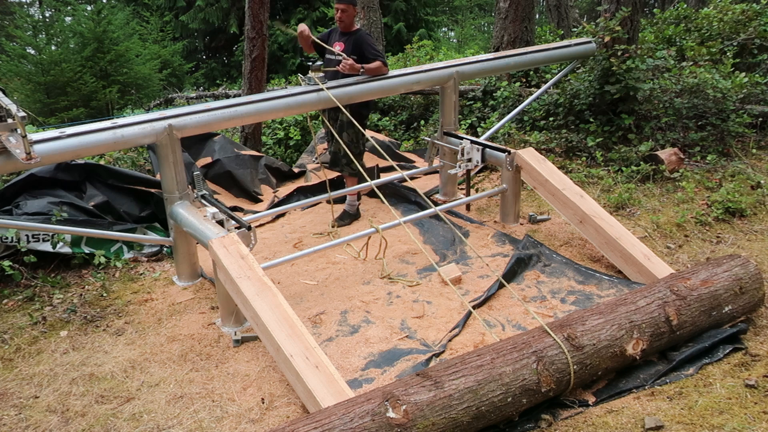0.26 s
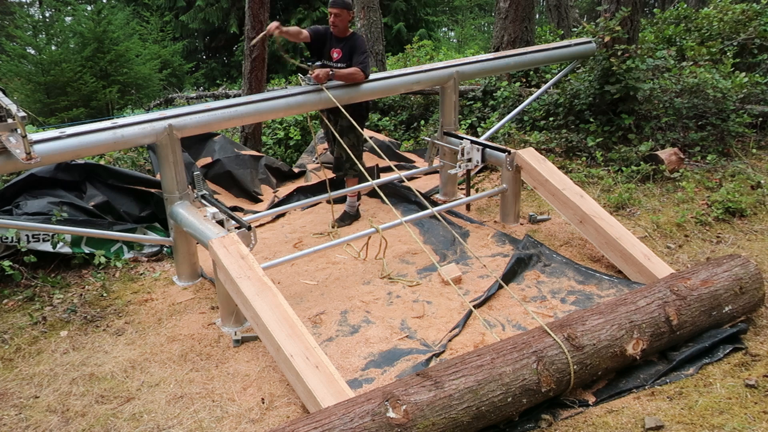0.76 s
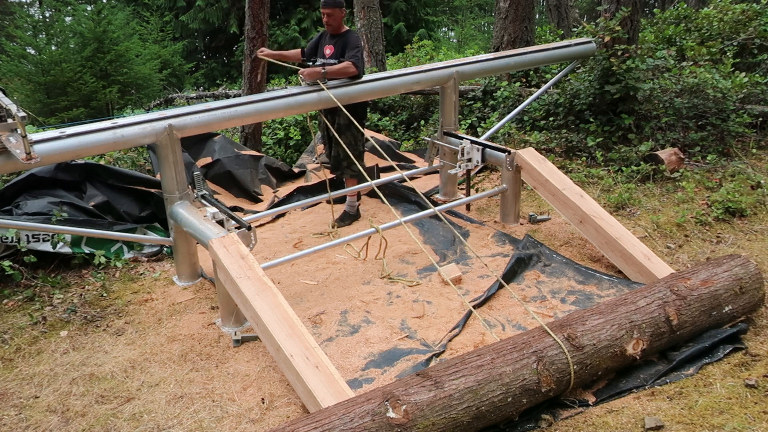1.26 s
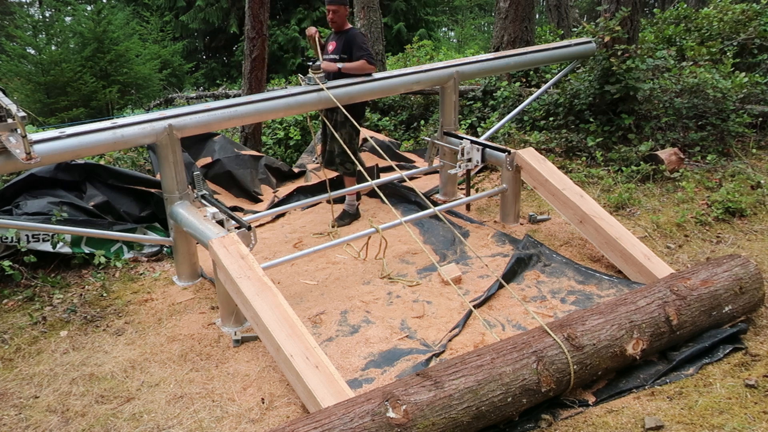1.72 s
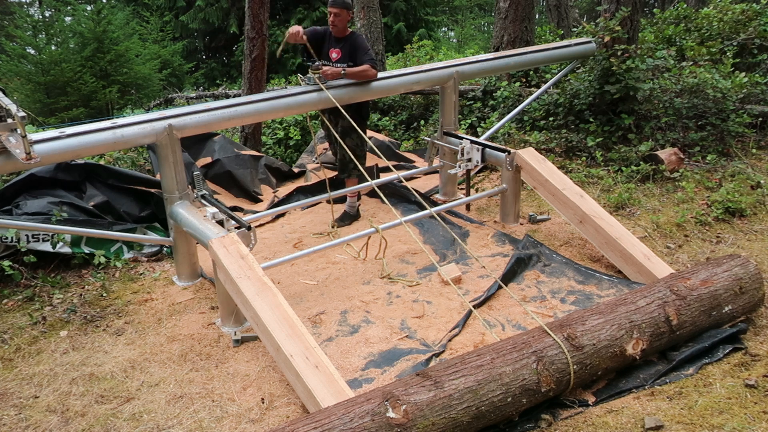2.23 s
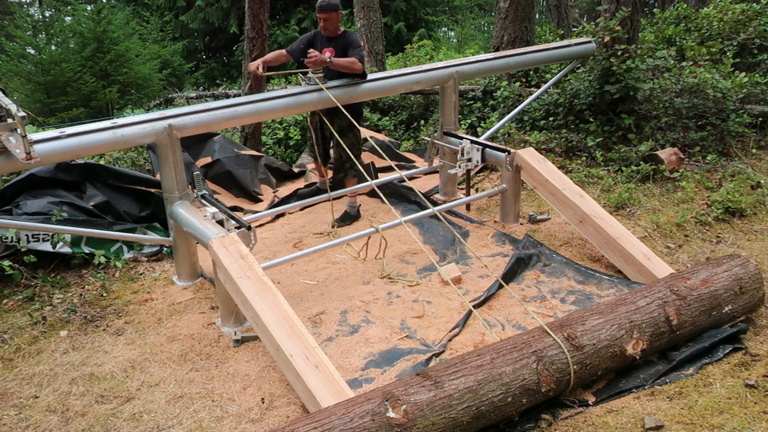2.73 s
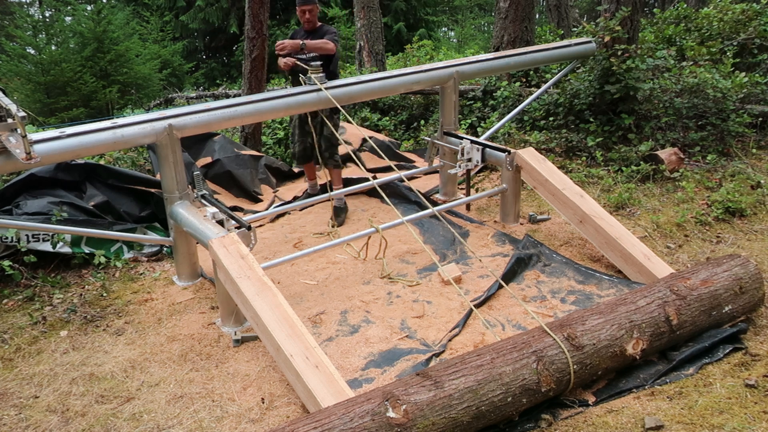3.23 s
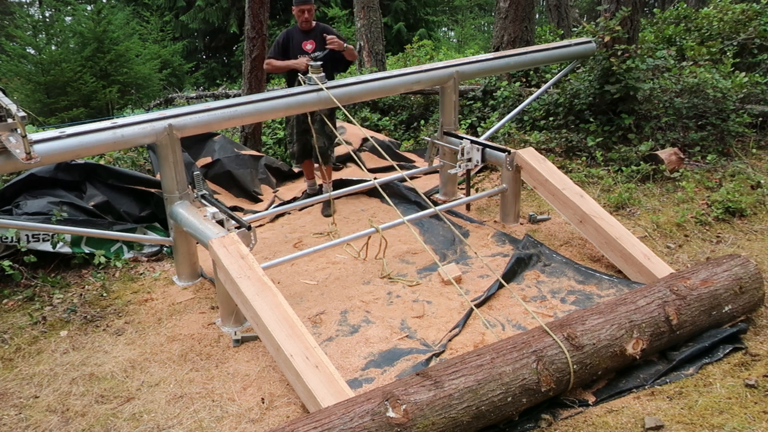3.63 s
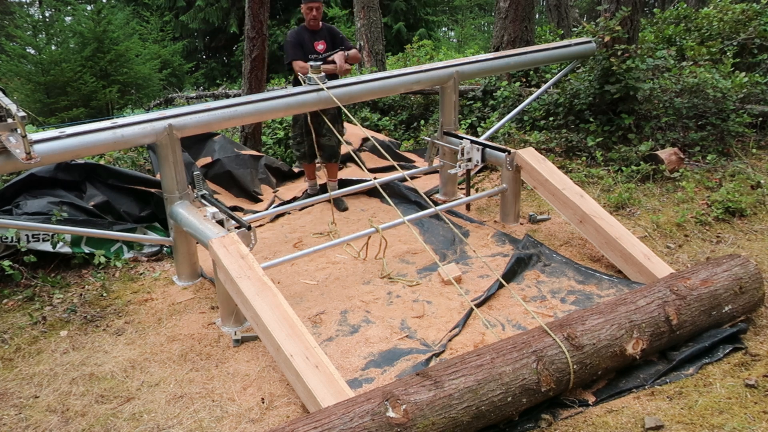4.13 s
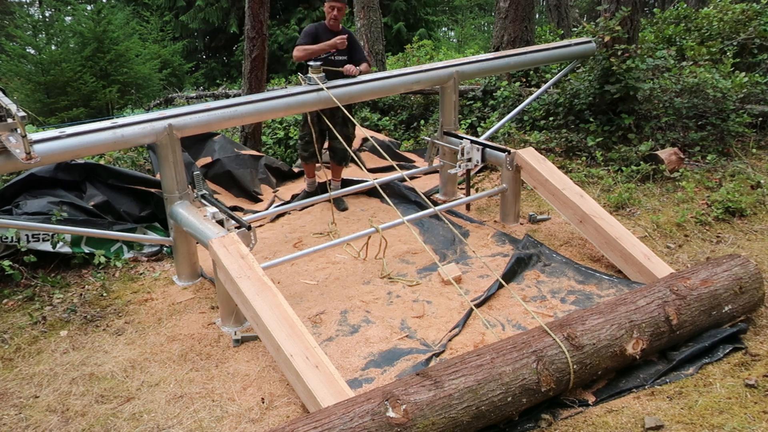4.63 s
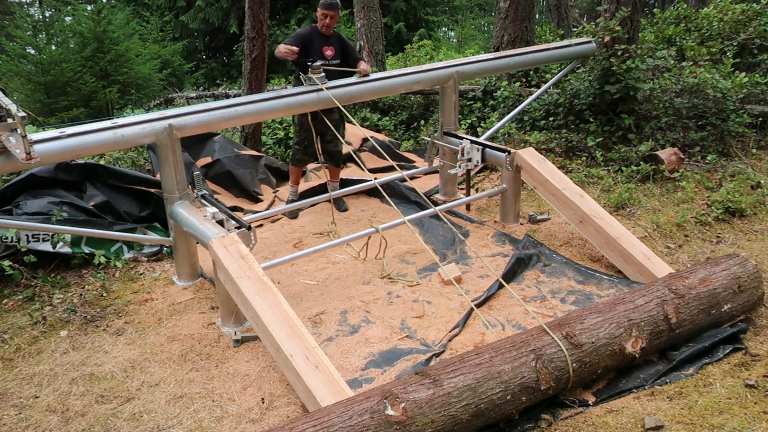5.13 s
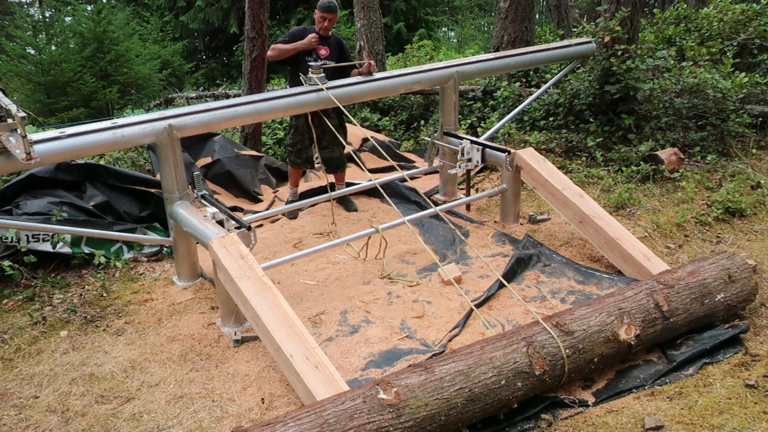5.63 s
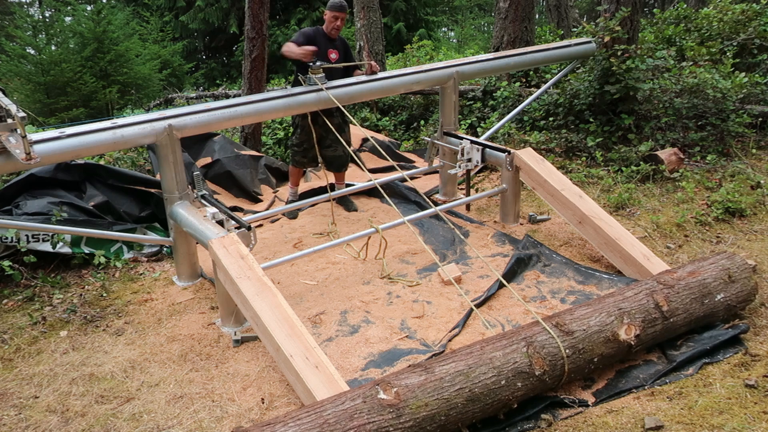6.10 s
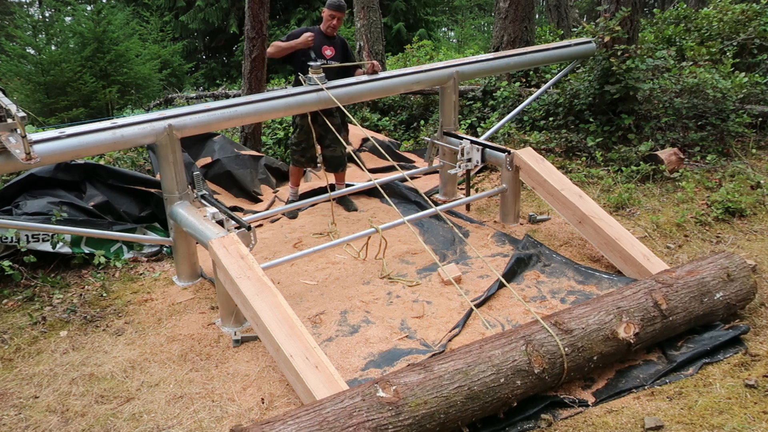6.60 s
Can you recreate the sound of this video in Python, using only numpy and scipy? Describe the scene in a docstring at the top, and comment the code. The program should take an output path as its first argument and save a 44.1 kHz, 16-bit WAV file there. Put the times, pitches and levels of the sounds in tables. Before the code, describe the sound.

In the woods, over a low rumble and soft leaf hiss, a hand winch clicks briefly and knocks against its hollow metal rail. After a pause, gritty rope rubbing leads into fast, irregular ratchet clicking and loud clunks, with a sharp snap of taut rope. A run of small gear chirps and a last few knocks follow. The winch sits near the centre of a stereo pair of microphones, with slight dull reflections.

```python
"""A forest clearing, a stereo pair of microphones facing a hand winch on a hollow metal rail.
As it is cranked the pawl drops from tooth to tooth and a small gear chirps; gears and handle knock
the rail as the load comes and goes, and the rope rasps and snaps over drum and rail.
Ground, timber and trunks echo dully, with a distant rumble and leaf hiss underneath.
The loudest knocks overload the recorder."""
import sys
import numpy as np
from scipy import signal
from scipy.io import wavfile

SR = 44100
rng = np.random.default_rng(int(sys.argv[2]) if len(sys.argv) > 2 else 0)


def master_out(mix):
    """Clip the mix to full scale and print it as 16-bit PCM to the path in sys.argv[1]."""
    frames = np.transpose(np.atleast_2d(mix))
    ceiling = np.clip(frames, -1, 1)
    pcm = np.round(ceiling * 32767).astype(np.int16)
    wavfile.write(sys.argv[1], SR, pcm)


N = 302443

# pawl landing on a tooth: t/s, level/dB
PAWL_DROPS = [(0.0434, -17), (0.0749, -16.5), (0.1, -27), (0.121, -21), (0.1453, -24.5), (.179, -25.5),
              (2.64, -22.5), (3.0715, -15.5), (3.1386, -15.5), (3.2092, -21), (3.251, -17), (3.2868, -17),
              (3.318, -16), (3.3473, -16.5), (3.3777, -18.5), (3.413, -15.5), (3.443, -17.5),
              (3.4716, -15.5), (3.5007, -15.5), (3.526, -14.5), (3.5494, -15.5), (3.5753, -15.5),
              (3.602, -16.5), (3.627, -18), (3.654, -18.5), (3.678, -12), (3.706, -28), (3.7385, -25.5),
              (3.777, -23.5), (3.823, -22.5), (3.87, -24), (3.92, -20), (4.065, -26.5), (4.115, -28),
              (4.66, -26), (4.8704, -19), (4.907, -20.5), (4.9358, -22), (4.9561, -17), (4.976, -17),
              (5.014, -14), (5.038, -20), (5.057, -27), (5.077, -18.5), (5.101, -18.5), (5.123, -13),
              (5.166, -26), (5.193, -28), (5.2185, -29), (5.243, -26), (5.2714, -23.5), (5.296, -23.5),
              (5.3254, -23.5), (5.3566, -23), (5.3871, -23.5), (5.4136, -23.5), (5.442, -26),
              (5.467, -20.5), (5.49, -20.5), (5.513, -26), (5.537, -23), (5.5643, -22), (5.6032, -22),
              (5.6463, -24), (5.678, -19.5), (5.7145, -17.5), (5.7616, -20), (6.811, -13.5)]
# modes of the pawl: f/Hz, level/dB, t60/s
PAWL_MODES = [(3420, -8.5, 0.011), (4080, -3, 0.021), (4763, 3, 0.018), (4920, -2.5, 0.012),
              (5180, -9, 0.017), (5630, -18, .015), (8200, -16, 0.011), (13300, -18, .008)]
# modes of the ratchet wheel: f/Hz, level/dB, t60/s
WHEEL_MODES = [(1240, 1, 0.0081), (1642, -1.5, 0.11), (1800, -16, 0.02), (2290, 1, 0.045), (2690, 1, 0.052),
               (3120, -7, 0.029)]
# knocks on the rail: t/s, level/dB, hardness/dB (more crack, less boom), rattle time/s, punch f/Hz
RAIL_KNOCKS = [(.085, -3.5, 4, 0.012, 376), (.351, -11, 0, 0.042, 394), (1.32, -9.5, -7, 0.058, 322),
               (1.341, -31, -1, 0.1, 420), (1.376, -14, -2.5, 0.033, 429), (1.63, -31.5, -19, 0.019, 427),
               (2.463, -27.5, -23, 0.027, 417), (2.674, -18.5, 26, 0.021, 820),
               (2.686, -25, 15, 0.027, 795), (2.807, -21, -7, 0.021, 480), (2.997, -19, -1, 0.07, 368),
               (3.171, -8.5, -7, 0.012, 415), (3.214, -6.5, 7.5, 0.0073, 261),
               (3.236, -19, -22, 0.0047, 440), (3.528, -25, 22.5, 0.012, 410),
               (3.68, -3.5, 10.5, 0.023, 263), (3.833, -15, -3, 0.044, 285), (3.862, -8.5, 2.5, 0.014, 255),
               (4.071, -12, 6.5, 0.03, 324), (4.084, -6, -4, 0.018, 428), (4.117, -28, -3, 0.11, 444),
               (4.686, -25, 17, 0.019, 324), (4.771, -20, 3, 0.048, 573), (4.824, -5, 10.5, 0.017, 277),
               (4.842, -20.5, -4, 0.068, 410), (5.1354, -3, 10, 0.014, 415), (5.266, -26.5, -13, 0.13, 282),
               (5.583, -6.5, -2, 0.022, 434), (5.6, -21.5, -4, 0.098, 583), (5.863, -15.5, 4.2, 0.071, 352),
               (5.904, -13, -15, 0.0082, 448), (6.12, -22.5, 4, 0.058, 390), (6.687, -17, -26, 0.025, 290),
               (6.747, -6, 6.5, 0.035, 262), (6.773, -9.5, 0, 0.019, 410), (6.823, -21, -17, 0.028, 445)]
# modes of the hollow rail: f/Hz, level/dB, t60/s
RAIL_MODES = [(213, -9, 0.049), (281, -0.5, 0.18), (311, -5.5, 0.14), (389.5, -2.5, 0.17), (429.4, 4, 0.14),
              (480, -0.5, 0.13), (742, -8, 0.18), (583, 3.5, 0.065), (658.7, 0.5, 0.18), (690.8, 0, 0.17),
              (895, -2.5, 0.091), (1056, -14, 0.27), (1335, -15, 0.18)]
# soft tooth contacts of the small gear: t/s, level/dB
GEAR_CHIRPS = [(0.286, -21), (0.401, -23), (1.261, -25), (5.98, -24.5), (6.02, -17.5), (6.062, -19),
               (6.101, -12), (6.132, -17), (6.162, -16), (6.1875, -23), (6.212, -17.5), (6.237, -19),
               (6.28, -15.5), (6.305, -17), (6.327, -15), (6.351, -14.5), (6.377, -16.5), (6.405, -17),
               (6.4313, -16), (6.4676, -13.5), (6.511, -14.5), (6.561, -16.5), (6.6053, -16)]
# modes of the small gear: f/Hz, level/dB, t60/s
GEAR_MODES = [(1124, -2.5, 0.03), (1400, -7, 0.029), (2197, 2.5, 0.0092), (2460, -2.5, 0.041),
              (2650, -4.5, 0.022), (3130, -14, 0.0098), (3630, -13, 0.024), (4390, -14, 0.029),
              (4620, -10.5, 0.028), (6200, -13.5, 0.014), (6700, -16.5, 0.019), (9550, -20.5, 0.011),
              (10650, -20, 0.008)]
# treble lift of the gear's chirps: t/s, level/dB
GEAR_TREBLE = [(.3, -20), (1.3, -4), (6.0, 1.5), (6.13, -24), (6.17, 6), (6.4, -0.5), (6.6, -0.5)]
# rope and gears rubbing: t/s, level/dB, grit/dB (more midrange and treble)
RASP_CURVE = [(0, -45.5, -3), (.06, -27.5, 2), (0.191, -36.5, 8), (0.251, -62, 4.5), (2.55, -43, -4),
              (2.668, -31.5, 5), (2.69, -25.5, 2), (2.87, -23, 6.5), (2.952, -17, 4.5), (2.986, -19.5, 4),
              (3.009, -36.5, 7), (3.2, -28.5, -3), (3.6, -26.5, 2), (3.8, -35, -7), (4.048, -42, -14),
              (4.08, -28, -1), (4.302, -67, 5), (4.65, -35, 2.5), (4.86, -32.5, -2), (4.952, -23.5, 2.8),
              (5.05, -24, 5.5), (5.3, -36.5, -1.5), (5.45, -31.5, 4.5), (5.75, -32.5, -2), (5.822, -39, -8),
              (6.12, -38, -13), (6.301, -30, -12), (6.66, -39, 1), (6.741, -35.5, -5.5), (6.8, -28, -1),
              (6.86, -29, 2)]
# spectrum of the rubbing: f/Hz, level/dB
RASP_SPECTRUM = [(24, -11), (40, 3), (200, 1.5), (440, 3.5), (1130, 0.5), (3730, -11.5), (6500, -16.5),
                 (9000, -19.5), (13000, -14.5), (15400, -44)]
# snaps of the taut rope: t/s, level/dB
ROPE_SNAPS = [(5.0305, -17), (5.0361, -10)]
# ticks without ring: t/s, level/dB, centre f/Hz
DRY_TICKS = [(0.8306, -30, 3760), (0.9862, -25, 3230), (0.9898, -19, 1160), (1.0648, -30, 5640),
             (1.216, -37, 4840), (1.329, -22, 3400), (2.138, -35, 5700), (2.612, -27.5, 3500),
             (2.6252, -24, 3000), (2.733, -28, 6500), (2.806, -14.5, 3500), (2.86, -19, 3300),
             (2.9565, -29, 6500), (3.036, -25, 4500), (4.149, -33, 4000), (4.193, -33, 5730),
             (4.5593, -28, 1800), (4.572, -42, 9000), (4.5785, -40, 9000), (4.604, -30, 4500),
             (4.6295, -25, 1500), (4.64, -26, 1490), (4.648, -37, 9000), (4.66, -19.5, 1700),
             (4.667, -33, 9000), (4.731, -25, 2500), (4.748, -26, 3500), (4.798, -30, 5000),
             (4.811, -24, 2300), (5.405, -27, 5000)]
# echoes off ground, timber and trunks: left delay/s, right delay/s, level/dB
ECHOES = [(.0031, 0.0053, -6.5), (0.0095, 0.015, -13.5), (0.029, 0.0214, -15), (0.042, 0.078, -21)]
# spectrum of the woods: f/Hz, level/dB
WOODS_SPECTRUM = [(12, -42), (20, -16), (70, -4.5), (130, -7.5), (210, -7.5), (500, -12), (1000, -19.5),
                  (3000, -29.5), (8000, -43), (15400, -55)]
# how alike the woods sound at the two microphones: f/Hz, likeness (0 to 1)
WOODS_LIKENESS = [(30, 0.71), (70, 1), (125, 0.45), (500, 0.01), (2000, 0.02), (8000, 0.031)]


def pawl():
    """The pawl slaps each tooth for a few ms: pawl and wheel ring, and a bright tick flies off."""
    s, db = np.transpose(PAWL_DROPS)
    wheel_db = db - db.mean() + rng.normal(-26, 5, len(s))  # follows the drop, give or take
    pawl_ring = ring(bursts(s, db - 19, 0.0024, rise_s=0.00041), PAWL_MODES, blow=3)
    wheel_ring = ring(bursts(s, wheel_db - 29.5, 0.0042), WHEEL_MODES, blow=7)
    pawl_slap = dense_modes(bursts(s, db - 8, 0.0081, rise_s=0.00053), 1650, 5700)
    wheel_slap = dense_modes(bursts(s, wheel_db - 7.5, 0.0092, rise_s=0.0019), 490, 3300)
    tick_db = db + rng.normal(-21, 4.5, len(s))
    tick = dense_modes(bursts(s, tick_db, 0.0082, rise_s=0.0014), 5700, 13400)
    # close pawl modes blur around the main one
    ping = dense_modes(bursts(s, db - 12, 0.007, rise_s=0.0014), 4600, 5140)
    return pawl_ring + ping + wheel_ring + pawl_slap + wheel_slap + tick


def rail_knocks():
    """Blows on the hollow rail: punch, boom, clunk and crack; rail and wheel ring, the posts thud."""
    s, db, hardness_db, rattle_s, punch_hz = np.transpose(RAIL_KNOCKS)
    boom_db, crack_db = db - 0.39 * hardness_db, db + hardness_db
    boom_force = bursts(s, boom_db - 11, 0.5 * rattle_s, rise_s=0.0035) + bursts(s, boom_db - 20, 0.088)
    boom = dense_modes(boom_force, 209.5, 480, blow=4.2)
    clunk_force = bursts(s, db - 8, 0.62 * rattle_s, rise_s=0.00097) + bursts(s, db - 26, 0.09)
    clunk = dense_modes(clunk_force, 292, 994, blow=0.3)
    crack = dense_modes(bursts(s, crack_db - 15, 0.59 * rattle_s, rise_s=0.0023), 790, 2660)
    thud = dense_modes(bursts(s, boom_db - 19, 0.045), 71, 211)
    clank = ring(bursts(s, crack_db - 40.5, 0.0013), WHEEL_MODES, blow=1.9)
    low_ring = ring(bursts(s, boom_db - 37, 0.87 * rattle_s), RAIL_MODES[:3], blow=8)
    high_force = bursts(s, db - 40, 1.044 * rattle_s) + bursts(s, db - 56.5, 0.1)
    high_ring = ring(high_force, RAIL_MODES[3:], blow=12.8)
    return punches(s, db + 6, punch_hz) + boom + clunk + crack + clank + thud + low_ring + high_ring


def punches(times, level_db, pitch_hz, rise_s=0.0019, fade_s=0.0083):
    """The struck span of rail makes a few clean swings, rising fast and fading."""
    out, t = np.zeros(N + SR), np.arange(SR // 10) / SR
    envelope = (1 - np.exp(-t / rise_s)) * np.exp(-t / fade_s)
    for s, db, hz in zip(times, level_db, pitch_hz):
        out[round(s * SR):][:len(t)] -= from_db(db) * envelope * np.sin(2 * np.pi * hz * t)
    return out[:N]


def small_gear():
    """Teeth slide into mesh and set the small gear chirping, some chirps brighter, some duller."""
    s, db = np.transpose(GEAR_CHIRPS)
    treble_db = db + np.interp(s, *np.transpose(GEAR_TREBLE))
    low_ring = ring(bursts(s, db - 34, 0.016), GEAR_MODES[:5], blow=7)
    low_scrape = dense_modes(bursts(s, db - 7.5, 0.0035, rise_s=0.0032), 560, 2800)
    high_ring = ring(bursts(s, treble_db - 32.5, 0.016), GEAR_MODES[5:], blow=3.5)
    high_scrape = dense_modes(bursts(s, treble_db - 21.5, 0.0055, rise_s=0.002), 3200, 6700)
    return low_ring + low_scrape + high_ring + high_scrape


def rope_rasp(slips_per_s=3500):
    """Dense uneven slips of rope and gear teeth: a gritty hiss that also shakes wheel, pawl and rail."""
    s, rasp_db, grit_db = np.transpose(RASP_CURVE)
    mid_db = rasp_db - 18 + 2 * grit_db
    high_db = -48 + 0.95 * (rasp_db + 29) + grit_db
    t = np.arange(N) / SR
    level, mid_level, high_level = (from_db(np.interp(t, s, db)) for db in (rasp_db, mid_db, high_db))
    shape = (2, 2, N)
    slipping = rng.random(shape) < slips_per_s / SR
    strength = from_db(3.63 * np.minimum(rng.exponential(1, shape), 5))
    slips = slipping * strength * rng.choice([-1, 1], shape)
    hiss = stereo_bands(slips, RASP_SPECTRUM, [(1000, 0.96), (4500, 0.79), (9000, 0.19)], flicker_db=0.71)
    low = level * rms_one(butter(hiss, 4, 7000, "low"))
    mids = mid_level * rms_one(butter(hiss, 2, [1500, 5600], "band"))
    high = high_level * rms_one(butter(hiss, 4, 7000, "high"))
    shaken_ratchet = ring(level * from_db(-50.5), WHEEL_MODES + PAWL_MODES)
    shaken_rail = ring(level * from_db(-51), RAIL_MODES)
    return low + mids + high + shaken_ratchet + shaken_rail


def rope_snaps():
    """The taut rope gives single sharp cracks."""
    s, db = np.transpose(ROPE_SNAPS)
    return dense_modes(bursts(s, db, 0.001), 2200, 6000, blow=2.6)


def dry_ticks(fade_s=0.0018, edge_ratio=1.48):
    """Ticks without ring, each a puff of noise round its own pitch."""
    out = np.zeros(N)
    fade = np.exp(-np.arange(SR // 40) / SR / fade_s)
    for s, db, hz in DRY_TICKS:
        puff = butter(fade * rng.standard_normal(len(fade)), 2, [hz / edge_ratio, hz * edge_ratio], "band")
        out[round(s * SR):][:len(fade)] += from_db(db) * puff * np.sqrt(SR / 2 / hz)
    return out


def echoes(sound):
    """A few dull reflections reach the two microphones at different moments."""
    out, dull = np.zeros((2, N)), signal.lfilter([0.6], [1, -0.4], sound)
    for left_s, right_s, db in ECHOES:
        for channel, lag in zip(out, (round(left_s * SR), round(right_s * SR))):
            channel[lag:] += from_db(db) * dull[:N - lag]
    return out


def woods(level_db=-33):
    """Distant rumble, much alike at both microphones, and leaf hiss spread wide."""
    noise = rng.standard_normal((2, 2, N))
    return from_db(level_db) * stereo_bands(noise, WOODS_SPECTRUM, WOODS_LIKENESS, flicker_db=0.78)


def bursts(times, level_db, decay_s, rise_s=0):
    """Force envelope: each contact starts at once, or swells for a moment, and dies away."""
    out = np.zeros(N)
    for s, db, tau in np.broadcast(times, level_db, decay_s):
        start, decay_samples = round(s * SR), max(tau * SR, 4)
        age = np.arange(int(7 * decay_samples))
        envelope = np.exp(-age / decay_samples) * np.minimum((age + 1) / (rise_s * SR + 1), 1)
        out[start:start + len(age)] += from_db(db) * envelope[:N - start]
    return out


def ring(force, modes, blow=0):
    """Each mode feels its own random chatter of the contact plus the clean jump in force, times blow."""
    out, jump = np.zeros(N), np.maximum(np.diff(force, prepend=0), 0)
    for hz, db, t60 in modes:
        radius, angle = from_db(-60 / (t60 * SR)), 2 * np.pi * hz / SR
        drive = force * rng.standard_normal(N) + blow * jump + 1e-18
        poles = [1, -2 * radius * np.cos(angle), radius ** 2]
        out += signal.lfilter([0, from_db(db) * np.sin(angle)], poles, drive)
    return out


def dense_modes(force, low_hz, high_hz, blow=0):
    """Modes too close to tell apart: chatter sounds as a band of noise, led by the blow's clean swing."""
    band_gain = np.sqrt(SR / 2 / (high_hz - low_hz))
    jump = np.maximum(np.diff(force, prepend=0), 0)
    drive = force * rng.standard_normal(N) - blow * band_gain * jump
    return band_gain * butter(drive, 3, [low_hz, high_hz], "band")


def stereo_bands(sources, spectrum, likeness, flicker_db):
    """Half-octave bands of two (mid, side) pairs, each with its own level, flicker and width; rms 1."""
    out, edges_hz = 0, 20 * 2 ** np.arange(0, 10, 0.5)
    shared_flicker = 0.5 * drift(30)
    for k, (low, high) in enumerate(zip(edges_hz, edges_hz[1:])):
        mid, side = butter(sources[k % 2], 2, [low, high], "band")
        hz = np.sqrt(low * high)
        alike = at_hz(likeness, hz)
        gain = from_db(at_hz(spectrum, hz) + flicker_db * (shared_flicker + drift(7.5)))
        out += gain * (np.sqrt(1 + alike) * mid + np.sqrt(1 - alike) * side * [[1], [-1]])
    return rms_one(out)


def drift(rate_hz):
    """Slow random wander: noise at every 40th sample through a double one-pole low-pass; rms near 1."""
    pole = np.exp(-2 * np.pi * rate_hz * 40 / SR)
    slow = signal.lfilter([1], [1, -2 * pole, pole ** 2], rng.standard_normal(N // 40 + 2002))[2000:]
    return np.interp(np.arange(N) / 40, np.arange(len(slow)), rms_one(slow))


def at_hz(table, hz):
    """Read a table on a log-frequency axis."""
    table_hz, values = np.transpose(table)
    return np.interp(np.log(hz), np.log(table_hz), values)


def butter(x, order, hz, kind):
    """Filter with a flat passband."""
    return signal.sosfilt(signal.butter(order, hz, kind, fs=SR, output="sos"), x)


def from_db(db):
    """Gain of a level in dB."""
    return 10 ** (np.asarray(db) / 20)


def rms_one(x):
    """Scale to rms 1."""
    return x / np.sqrt(np.mean(x ** 2) + 1e-20)


def scene():
    """Rail dead centre, clicks and rasp a touch to the left, their echoes, and the woods behind."""
    clicks = pawl() + small_gear() + rope_snaps() + dry_ticks()
    knocks = rail_knocks()
    background = woods()
    winch = clicks * from_db([[0.8], [-0.8]]) + knocks + rope_rasp() * from_db([[0.3], [-0.3]])
    return winch + echoes(clicks + 0.2 * knocks) + background


def record(dry, cutoff_hz=15600):
    """The microphones fade at the very top; the recorder flattens the loudest peaks and cuts the top."""
    overloaded = np.clip(butter(dry, 4, 14200, "low"), -1, 1)
    return signal.sosfilt(signal.cheby2(20, 40, cutoff_hz, fs=SR, output="sos"), overloaded)


dry = scene()
out = record(dry)
master_out(out)
```